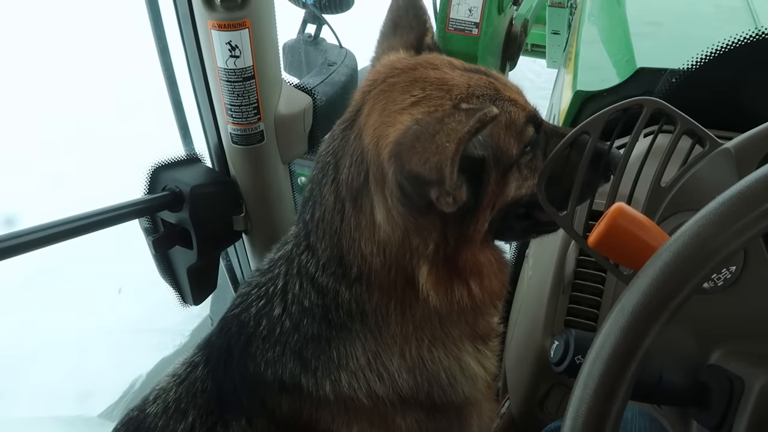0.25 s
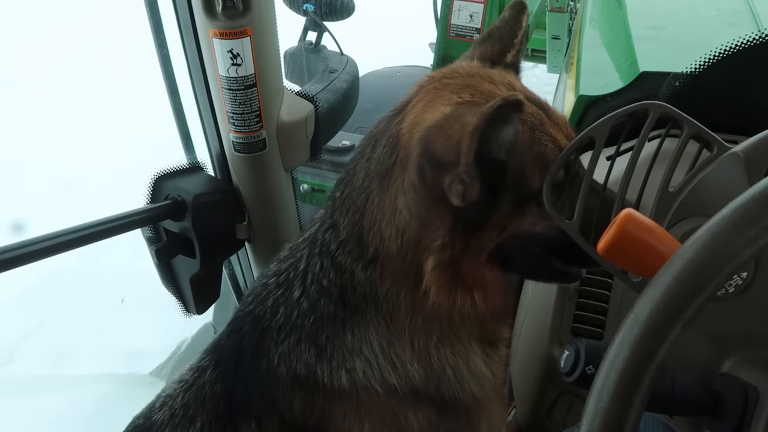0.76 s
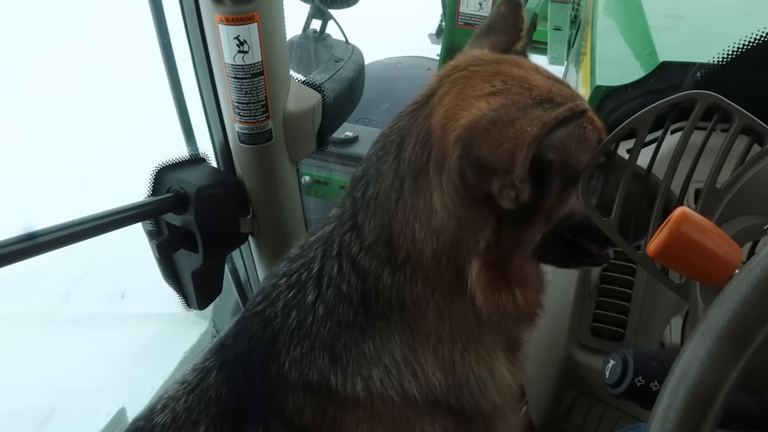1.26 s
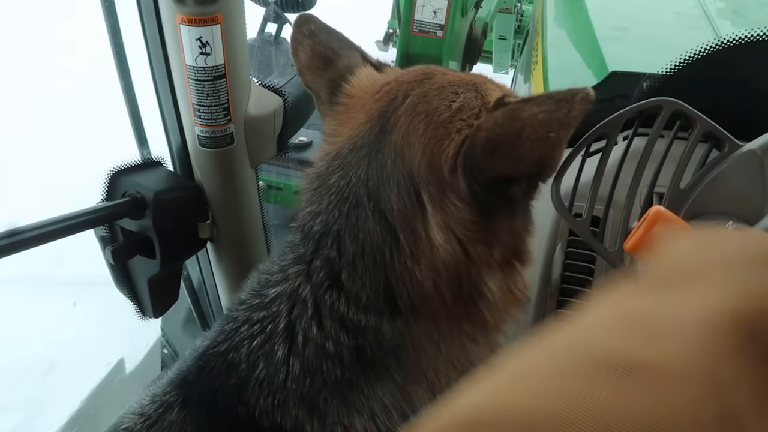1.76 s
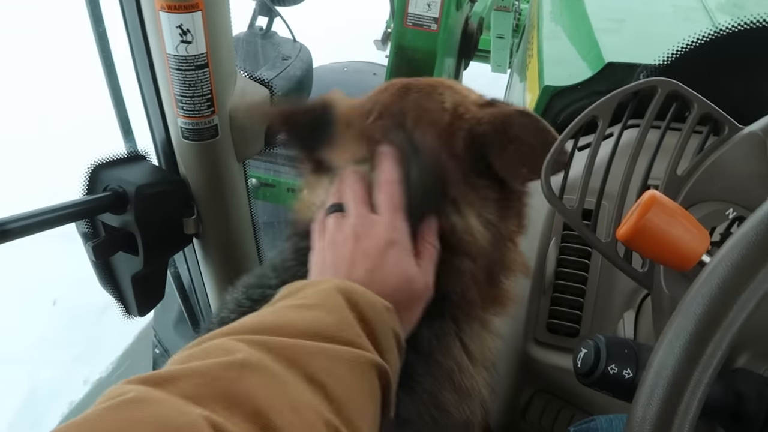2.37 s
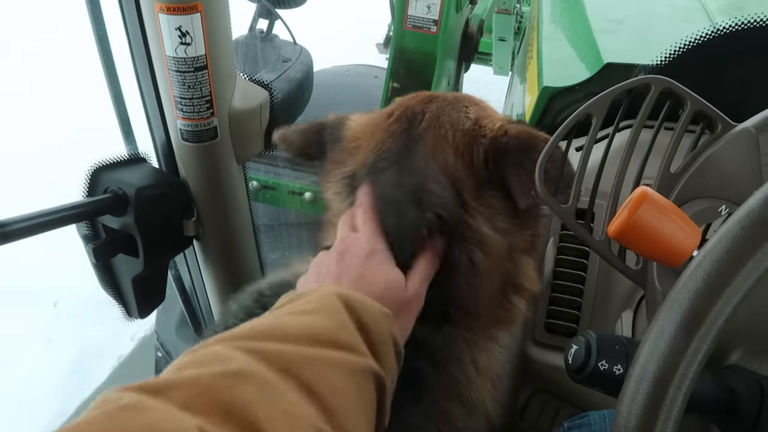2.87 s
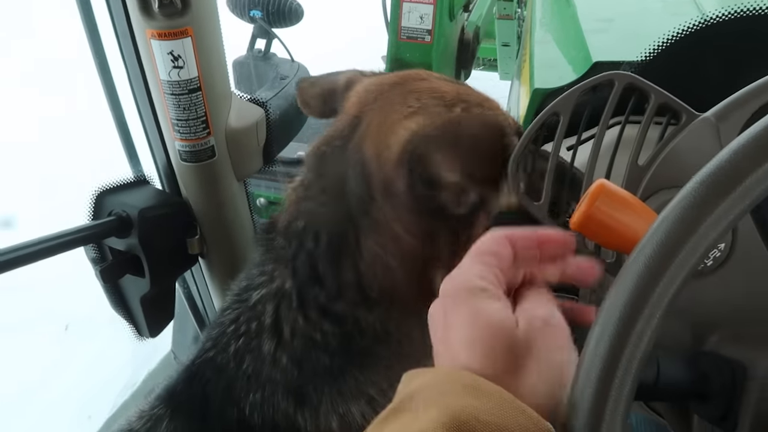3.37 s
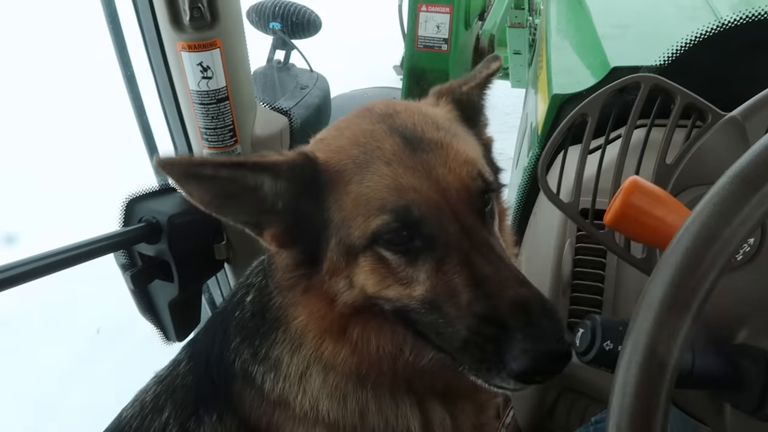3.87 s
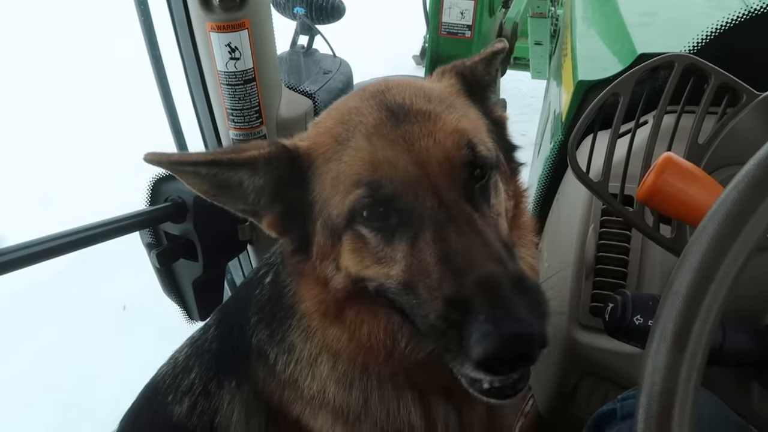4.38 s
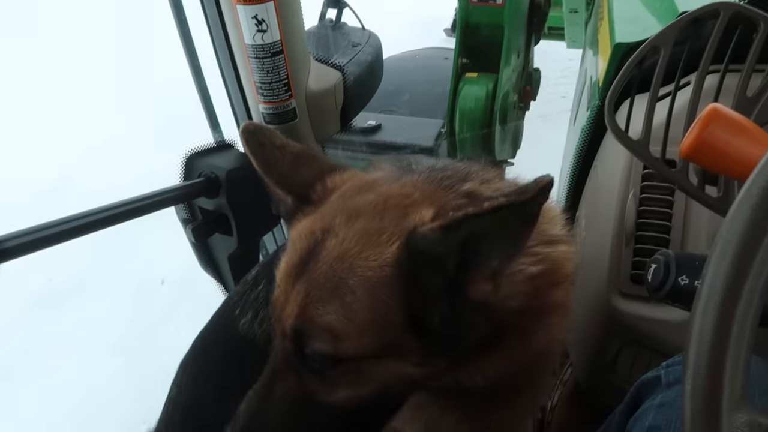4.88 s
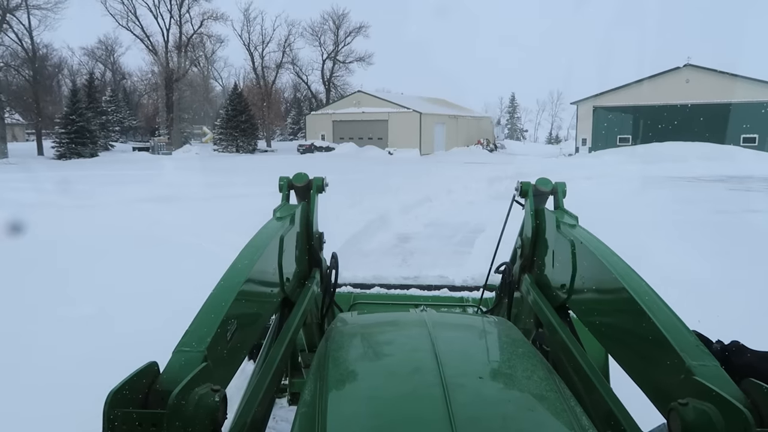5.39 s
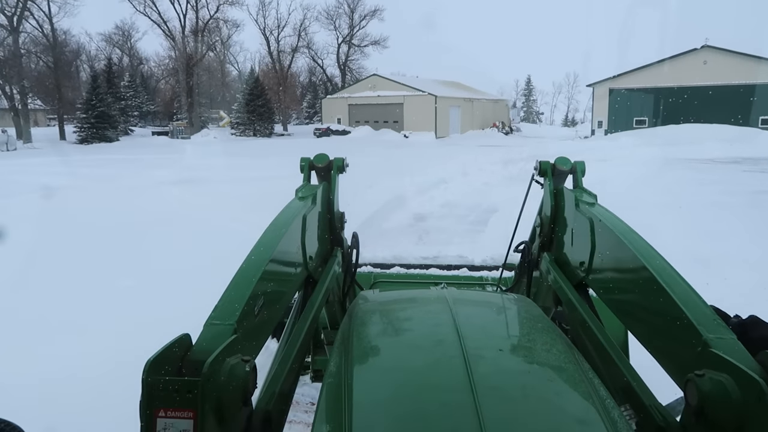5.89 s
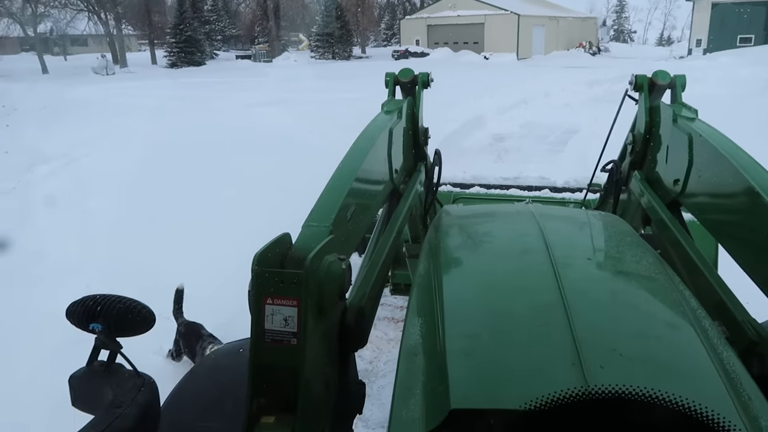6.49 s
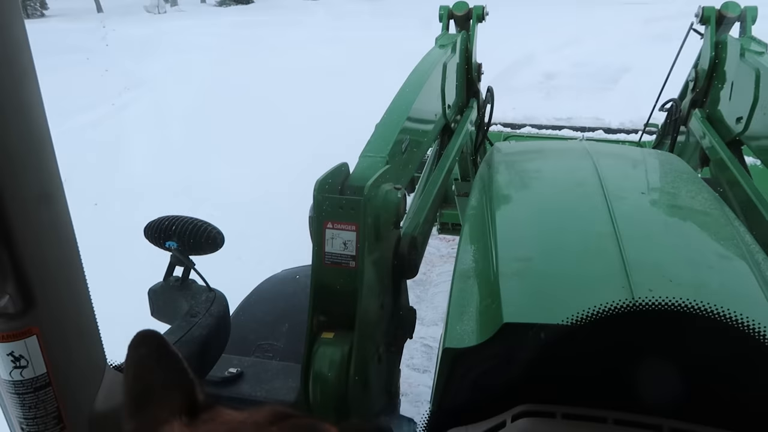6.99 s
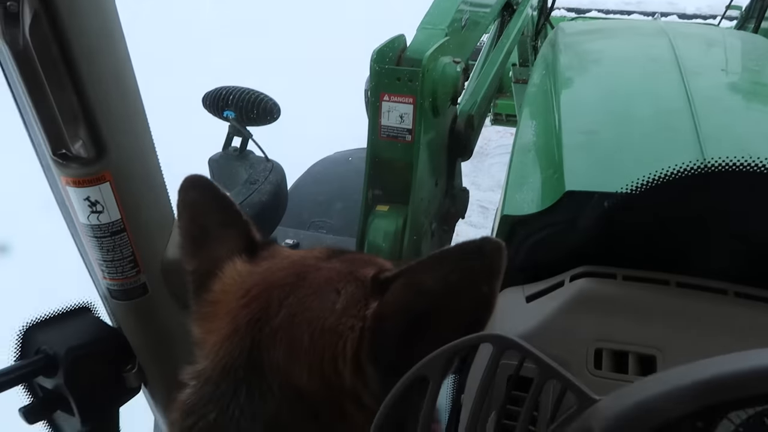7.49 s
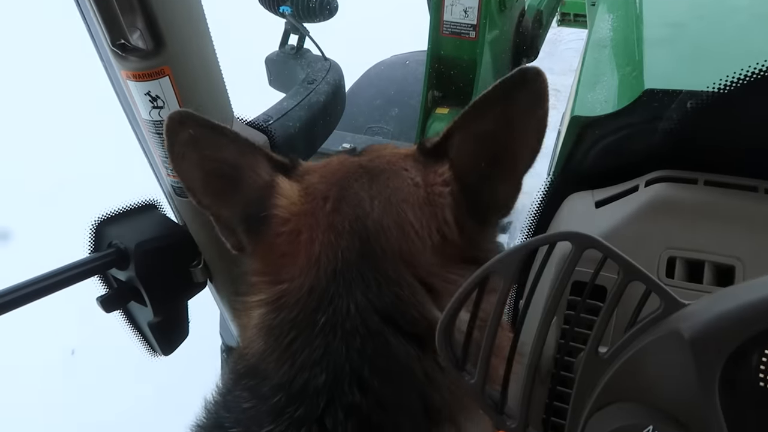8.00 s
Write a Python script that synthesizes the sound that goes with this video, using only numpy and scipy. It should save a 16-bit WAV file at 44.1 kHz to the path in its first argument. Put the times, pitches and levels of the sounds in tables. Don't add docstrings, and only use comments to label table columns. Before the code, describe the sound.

Heard from inside a closed tractor cab, a diesel runs steadily at high idle, its low drone wrapped in panel boom and hiss. Loose trim buzzes in short irregular bouts. After just over five seconds comes a tiny silent gap, then the tractor is rolling: slightly lower drone, slow throb, floor bumps, one crunchy snap and a pump whine that grows louder.

```python
import sys
import numpy as np
from scipy import signal
from scipy.io import wavfile
from scipy.ndimage import uniform_filter1d

SR = 44100
rng = np.random.default_rng(int(sys.argv[2]) if len(sys.argv) > 2 else 0)


def log_audio(samples):
    frames = np.atleast_2d(samples).T
    limited = np.clip(frames, -1, 1)
    pcm = np.round(limited * 32767).astype(np.int16)
    wavfile.write(sys.argv[1], SR, pcm)


def how_loud(loudness_db):
    steps = np.asarray(loudness_db, float) / 20
    return 10 ** steps


N = 363807
T = np.arange(N) / SR
STANDING_END_S, ROLLING_START_S = 5.21772, 5.24219

# (time [s], crank speed [turns/s], effort [dB], drive-line load [dB])
ROLLING_ENGINE = [(5.27, 33.84, -35.5, -1), (5.65, 33.84, -34, 1.5), (6.3, 34.1, -34.5, 0.5),
                  (6.67, 33.7, -35.5, -1), (6.95, 33.88, -33, -6), (7.4, 33.5, -33, -6),
                  (7.7, 33.85, -32.5, -4), (8.25, 32.7, -32, -4)]
# (start [s], length [s], level [dB], lean to the upper tongue [dB])
BUZZ_BOUTS = [(0, .095, -47.5, -1), (0.206, .13, -48.5, 1), (0.421, .1, -50, 2), (0.545, .2, -48, 0),
              (0.766, .04, -49, -4), (.839, .1, -48.5, 3), (1.023, 0.047, -47, 0), (1.121, .075, -49.5, -1),
              (1.454, .09, -46.5, 0), (1.596, .16, -47, 1), (1.822, 0.04, -44.5, 0),
              (1.914, 0.052, -45, -2), (2.143, 0.026, -47, -3), (2.221, .138, -47.5, 1),
              (2.42, .11, -50.5, 0), (2.557, .14, -46.5, -1), (2.728, .165, -46.5, -1),
              (3.014, .131, -49, 2.5), (3.23, 0.079, -50.5, 4), (3.381, .17, -48, 1.5),
              (3.655, 0.054, -49.5, -1), (3.803, 0.12, -49.5, -1), (3.992, 0.05, -48.5, -6),
              (4.096, 0.019, -45.5, -2), (4.215, .039, -47.5, -3), (4.561, 0.049, -46.5, -2),
              (4.662, 0.083, -46.5, 2), (4.778, 0.085, -47, -1), (4.942, 0.042, -44.5, 1.5),
              (5.046, 0.11, -46.5, 3.5)]


def evened(x):
    return x / np.sqrt(np.mean(x ** 2) + 1e-20)


def read(points, hz):
    f, value = np.transpose(points)
    return np.interp(np.log(hz + 1), np.log(f + 1), value)


def curves(rows, t):
    s, *columns = np.transpose(rows)
    return [np.interp(t, s, column) for column in columns]


def span(s, length, rise_s):
    return np.clip(np.minimum(T - s, s + length - T) / rise_s + 0.83, 0, 1)


def drift(top_hz, low_hz=.3, count=16):
    t = T[::256]
    slow = sum(np.sin(2 * np.pi * (f * t + rng.random())) / np.sqrt(f)
               for f in np.geomspace(low_hz, top_hz, count))
    return np.interp(T, t, evened(slow))


def rough_tone(hz, db, wobble_db, jitter):
    level = how_loud(db + wobble_db * drift(60, low_hz=6))
    phase = 2 * np.pi * np.cumsum(hz * np.ones(N)) / SR
    return np.sqrt(2) * level * np.cos(phase + jitter * drift(60, low_hz=6))


def resonate(x, hz, width):
    pole = np.exp((2j * hz - width) * np.pi / SR)
    return signal.lfilter([1], np.poly([pole, pole]), x).real


def shaped(db, size):
    z = rng.standard_normal(db.shape[::-1] + (2,)) @ [1, 1j]
    return signal.istft(z.T * how_loud(db), nperseg=size, noverlap=size * 3 // 4)[1][:N]


def effort(rows):
    db = curves(rows, T)[1]
    return db - np.median(np.transpose(rows)[2])


def engine(rows, strong, weak, at, angle, smear, wobble_db):
    rock_per_effort = .9
    gears_above, gears_s, gears_width_s, gears_db = 25, 2.3, .8, 5
    speed = curves(rows, T)[0]
    turns = np.cumsum(speed) / SR
    turns = turns - turns[round(at * SR)] + angle
    gap = speed - np.mean(np.transpose(rows)[1])
    orders = []
    for k, db, slope, wobble in strong:
        level = db + slope * gap + wobble * drift(12)
        if k == 1:
            level = level + rock_per_effort * effort(rows)
        orders.append((k, level))
    sing = gears_db * (np.exp(-((T - gears_s) / gears_width_s) ** 2) - .4)
    for k, db in weak:
        orders.append((k, db + wobble_db * drift(9.8) + (k > gears_above) * sing))
    tones = sum(np.sqrt(2) * how_loud(db) * np.cos(2 * np.pi * (k * turns + smear * (k - 3.5) ** 2))
                for k, db in orders)
    return tones, turns


def drive(turns, smear):
    # (start [s], length [s], level [dB])
    lurch_rows = [
        (5.29, .06, -21),
        (5.7, .1, -19),
        (5.95, .06, -25),
        (6.13, .16, -19),
        (6.5, .06, -22),
        (6.84, .08, -24),
        (7.3, .06, -15),
        (7.4, .14, -18),
        (7.82, .08, -23),
        (8.1, .1, -22),
    ]
    frame_hz = 99.5
    order, drive_db, in_step_s, slip = 4, -23.5, 6.17, .597
    heave = how_loud(-20) * span(5.24, .25, .04) * np.cos(2 * np.pi * (turns + smear * 2.5 ** 2))
    load_db = curves(ROLLING_ENGINE, T)[2]
    angle = order * (turns - slip * (T - in_step_s)) + smear * (order - 3.5) ** 2
    throb = how_loud(drive_db + load_db) * np.cos(2 * np.pi * angle)
    lurch = np.max([how_loud(db) * span(s, length, .04) for s, length, db in lurch_rows], 0)
    return np.sqrt(2) * (heave + throb) + lurch * rough_tone(frame_hz, 0, 1.2, .3)


def whine(floor_db):
    # (time [s], pitch [Hz], level [dB])
    pump_rows = [
        (5.27, 347.5, -31),
        (6.6, 349.4, -31.5),
        (7.17, 347.2, -31.5),
        (7.29, 347.6, -24.5),
        (7.86, 348.3, -23.5),
        (8.25, 349, -21.5),
    ]
    clean_db, db_per_bump, overtone_db = -28.5, .48, -19
    hz, db = curves(pump_rows, T)
    loose = 1 / (1 + how_loud(2 * (db - clean_db)))
    shaken_db = db + db_per_bump * loose * (floor_db - floor_db.min())
    pump = rough_tone(hz, shaken_db, 1.2 + 2.2 * loose, .27 + .45 * loose)
    overtone = rough_tone(3 * hz, db + overtone_db, 1.5, .5)
    floor_hum = rough_tone(246., .95 * floor_db - 33, 2.7, .76)
    return pump + overtone + floor_hum


def tongue(taps, hz, width, across_db):
    loose = np.exp(-((T - 2.9) / .85) ** 2)
    wander, loose_wander, loose_loss = .008, .025, .7
    stray = hz * (1 + (wander + loose_wander * loose) * drift(12, low_hz=1.5) - .3 * loose_wander * loose)
    song = np.array([rough_tone(stray, 0, 2.7, .94), rough_tone(stray, 0, 3.0, 1.1)])
    struck = (1 - loose_loss * loose) * evened(resonate(taps, hz, width))
    return how_loud([[0], [across_db]]) * (.72 * song + .7 * struck)


def trim(turns):
    # (pitch [Hz], width [Hz], level [dB], level across the stereo width [dB])
    body_modes = [(1725, 160, 4, -7), (2085, 160, 8, -7.5), (2393, 140, 4, -10), (2753, 81, 0, -13),
                  (3410, 210, 0, -8), (4250, 290, -2, -11), (4770, 190, -1.5, -7.5), (5870, 90, -22, -24)]
    # (pitch [Hz], width [Hz], steady noise they must top [dB], level across the width [dB])
    tongue_rows = [(4475, 60, -65, -8), (3920, 83, -51.5, -12), (6100, 60, -65, -5)]
    thin_db = -19 + 11 * np.exp(-((BUZZ_BOUT_STARTS - 3.9) / .27) ** 2)
    noise_power = how_loud(2 * np.array(tongue_rows)[:, 2])
    rings = np.zeros((3, N))
    for (s, length, bout_db, lean_db), wake_db in zip(BUZZ_BOUTS, thin_db):
        db = np.array([bout_db + lean_db, bout_db - lean_db, bout_db + wake_db])
        over = np.maximum(how_loud(2 * db) - noise_power, 0)
        rings = np.maximum(rings, np.sqrt(over)[:, None] * span(s, length, .015))
    shake = .9 + np.maximum(np.cos(12 * np.pi * turns) + .5 * np.cos(6 * np.pi * turns), 0)
    taps = evened(rng.standard_normal((2, N)) * (rng.random(N) < 2500 * shake ** 2 / SR))
    body = sum(how_loud(2 * drift(13) + [[db], [across]]) * evened(resonate(taps, hz, width))
               for hz, width, db, across in body_modes)
    tongues = sum(ring * tongue(taps, hz, width, across)
                  for ring, (hz, width, _, across) in zip(rings, tongue_rows))
    return tongues + (.5 * rings[0] + .43 * rings[1]) * body


BUZZ_BOUT_STARTS = np.array(BUZZ_BOUTS)[:, 0]


def snap():
    # (frequency [Hz], level [dB])
    crunch_colour = [(300, -33), (1200, -1), (2500, 4), (4000, -4), (5500, -19), (7500, -24), (9000, -43),
                     (14000, -72)]
    start_s, length_s, db = 5.861, .034, -20.5
    colour = read(crunch_colour, np.fft.rfftfreq(256, 1 / SR))[:, None] + np.zeros(N // 64 + 5)
    u = np.clip((T - start_s) / length_s, 0, 1)
    shape = np.minimum(u / .31, 1) * (1 - u) ** .74
    pair = np.array([evened(shaped(colour, size=256)) for _ in range(2)])
    return how_loud([[db], [db - 9]]) * shape * pair


def bumps():
    # (start [s], length [s], lift over the calm boom [dB])
    bump_rows = [
        (5.66, 0.11, 4.5),
        (5.89, 0.12, 4.5),
        (6.45, 0.12, 5.5),
        (6.77, .1, 9),
        (6.9, 0.11, 12),
        (7.02, .12, 13),
        (7.42, .12, 7),
        (7.56, .25, 8.5),
        (7.9, .15, 6),
        (8.12, 0.058, 7),
    ]
    calm_db, rise_s = -3.5, .046
    return calm_db + np.max([db * span(s, length, rise_s) for s, length, db in bump_rows], 0)


def roar(levels, mid, side, panels, turns, boom_hz, mid_db, side_db, patchy_db, knock):
    # (frequency [Hz], level [dB])
    middle_top = [(8500, -2), (11000, -1.5), (12500, -7.5), (14500, -12), (16000, -44.5)]
    hz, frames = np.fft.rfftfreq(2048, 1 / SR)[:, None], N // 512 + 5
    boom, clatter, air = (np.interp(np.arange(frames) * 512 / SR, T, db) for db in levels)

    def patches(bins, steps):
        grains = rng.standard_normal((len(hz), frames))
        return evened(uniform_filter1d(uniform_filter1d(grains, bins, axis=0), steps, axis=1))

    low = 1 / (1 + (hz / 800) ** 3)
    high = 1 / (1 + (5500 / (hz + 1)) ** 6)
    floor_pan = .28 / (1 + (170 / (hz + 1)) ** 6) + .5 / (1 + ((hz - boom_hz) / 40) ** 2)
    swell = low * floor_pan * boom + (1 - low - high) * clatter + patchy_db * patches(8, 6)
    swell = swell + 3 * patches(24, 3) / (1 + (8500 / (hz + 1)) ** 8)
    rings = 1 + sum(how_loud(2 * np.array(db))[:, None, None] / (1 + (2 * (hz - f) / width) ** 2)
                    for f, width, *db in panels)
    mid_field = read(mid, hz) + read(middle_top, hz) + high * air
    side_field = read(side, hz) + .4 * high * air
    pair = [evened(shaped(field + swell + 10 * np.log10(ring), size=2048))
            for field, ring in zip((mid_field, side_field), rings)]
    pair = how_loud([[mid_db], [side_db]]) * pair
    pulse = np.cos(np.pi * turns) + .48 * np.cos(3 * np.pi * turns) + .5 * np.cos(6 * np.pi * turns)
    treble = signal.sosfilt(signal.butter(2, 500, "high", fs=SR, output="sos"), pair)
    return pair + knock * pulse * treble


def standing():
    # (time [s], crank speed [turns/s], effort [dB], floor shake [dB])
    engine_rows = [(0, 34.9, -30, 3), (.35, 34.9, -29, -1), (.75, 35.0, -31, -1.5), (1.15, 34.8, -28, 4),
                   (1.45, 34.8, -28.5, 2.5), (1.75, 35, -28, 1), (2.15, 35.1, -28.5, 1.5),
                   (2.6, 35.05, -27.5, 2.5), (2.95, 35.05, -28.5, -2), (3.35, 34.8, -28, -3),
                   (3.55, 34.8, -25.5, 2.5), (3.9, 35.2, -28.5, 2), (4.15, 35.3, -31, -2),
                   (4.45, 35.3, -29, -8), (4.75, 35.1, -30, -7), (4.95, 34.8, -29.5, -1),
                   (5.2, 34.8, -26.5, 3)]
    # (multiple, level [dB], slope about mean speed [dB per turn/s], wobble [dB])
    strong = [(1, -24.5, -3, .6), (3, -18.3, 4.5, 1.3), (4, -18.3, -4.5, 0.86), (5, -28.5, 9, 1.2),
              (6, -23, 3.5, 1.5)]
    # (multiple, level [dB])
    weak = [(1.48, -47), (1.995, -43), (2.71, -46.5), (5.32, -41.5), (6.836, -32.5), (7.08, -37),
            (8.015, -38.5), (8.93, -39.5), (11.91, -45.5), (12.44, -37), (28.63, -47), (17.74, -42),
            (21.87, -38.5), (27.45, -41), (36.2, -39.5)]
    # (frequency [Hz], density [dB per Hz])
    mid = [(20, -31), (45, -3.5), (80, -18.5), (125, 4), (165, -9.5), (240, 2), (360, -9), (600, -10.5),
           (1150, -14), (2500, -19.5), (3500, -27.5), (5200, -37.5), (9000, -51), (13000, -51.5)]
    side = [(40, -36), (77, -17), (135, 4.5), (234, -34), (412, -3.5), (559, -24), (1100, -10.5),
            (2600, -14), (5000, -22), (6500, -24), (9000, -26.5), (11600, -24.5), (14200, -30.5),
            (15400, -51)]
    # (pitch [Hz], width [Hz], level over the roar [dB], the same across the width [dB])
    panels = [(418, 19.4, 3, 2.5), (623, 8.3, -5.5, 2), (778, 43, 11, -1), (800, 30, -12.5, 1),
              (993, 20, 8, 7.5), (1295, 30, 8, 6), (1676, 230, 3, 0.5), (2220, 31, -2.5, 7),
              (3870, 70, 2.5, 5), (4490, 100, 6, 3)]
    tones, turns = engine(engine_rows, strong, weak, STANDING_END_S, -.015, .2, 1.8)
    work = effort(engine_rows)
    busy = np.max([span(s, length, .019) for s, length, *_ in BUZZ_BOUTS], 0) - .6
    rattle = busy * (.8 + 1.9 * np.exp(-((T - 4.7) / 1.1) ** 2))
    boom = curves(engine_rows, T)[2] + 2.0 * drift(10, low_hz=2)
    clatter = .65 * work + rattle
    air = .8 * work + .84 * rattle + .7 * drift(20, low_hz=3)
    hiss = roar((boom, clatter, air), mid, side, panels, turns, boom_hz=286, mid_db=-21.5, side_db=-41,
                patchy_db=1.34, knock=.07)
    return hiss + trim(turns) + tones * how_loud([[0], [-38]])


def rolling():
    # (multiple, level [dB], slope about mean speed [dB per turn/s], wobble [dB])
    strong = [(1, -32, 0, 2), (3, -31, 0, 2), (4, -20, 0, 1.8), (5, -27.5, 0, 2.5)]
    # (multiple, level [dB])
    weak = [(.5, -49), (2, -34), (5.5, -49.5), (6, -37.5), (7, -41), (7.75, -47), (11.5, -47), (35.7, -42),
            (55.1, -44.5)]
    # (frequency [Hz], density [dB per Hz])
    mid = [(20, -18), (50, -2.5), (110, 7), (200, -1.5), (285, -10), (400, -7.5), (800, -13.5),
           (1600, -17.5), (2950, -16.5), (3350, -24), (5200, -37.5), (8000, -52.5), (10000, -58.5),
           (13000, -61)]
    side = [(40, -31.5), (110, -5), (317, -9), (537, -12.5), (805, -15), (1340, -10), (2460, -10.5),
            (3450, -12.5), (5100, -19.5), (6500, -27), (9000, -29.5), (12900, -34), (14200, -43),
            (15400, -51)]
    # (pitch [Hz], width [Hz], level over the roar [dB], the same across the width [dB])
    panels = [(243, 36, 4.7, 4.5), (326, 48, 7.4, 0.5), (382, 19, 4.6, 8), (657, 310, 2.1, -0.5),
              (1025, 9, 2.3, 7.5), (1233, 17, 6.3, 4.5), (1384, 52, 6.5, 5), (1802, 40, 5.5, 4),
              (2390, 560, 4.3, 4.5), (2750, 95, 1, -1)]
    tones, turns = engine(ROLLING_ENGINE, strong, weak, ROLLING_START_S, -.0647, .03, 2.0)
    work, boom = effort(ROLLING_ENGINE), bumps()
    clatter = .72 * work + .067 * boom
    air = .8 * work + .15 * boom + .8 * drift(20, low_hz=3) + 2.1
    hiss = roar((boom, clatter, air), mid, side, panels, turns, boom_hz=263, mid_db=-20.5, side_db=-40.5,
                patchy_db=1.44, knock=.082)
    return hiss + snap() + (tones + drive(turns, .042) + whine(boom)) * how_loud([[0], [-36]])


def scene():
    mid, side = standing() * (T < STANDING_END_S) + rolling() * (T >= ROLLING_START_S)
    side = side - .43 * np.gradient(mid)
    side = side + .2 * np.gradient(np.gradient(mid))
    return np.array([mid + side, mid - side]) * how_loud([[-.1], [.1]])


def low_pass(x):
    return signal.sosfilt(signal.butter(12, 16000, fs=SR, output="sos"), x)


def record(dry):
    edge = signal.firwin(255, 16000, window=("kaiser", 8), fs=SR)
    mix = signal.oaconvolve(dry, edge[None], "same", axes=1)
    return low_pass(mix)


dry = scene()
out = record(dry)
log_audio(out)
```